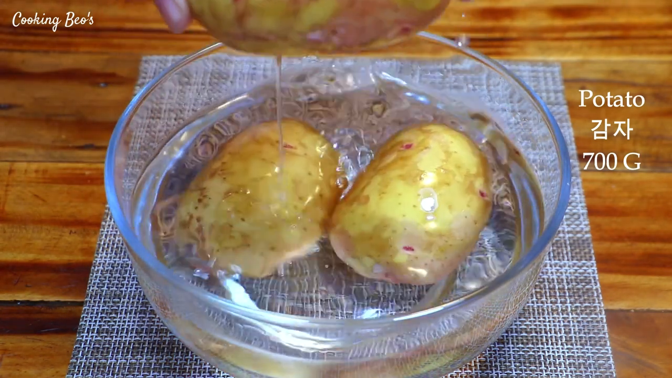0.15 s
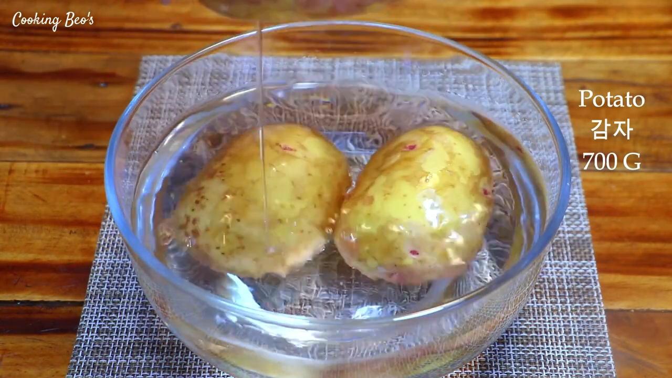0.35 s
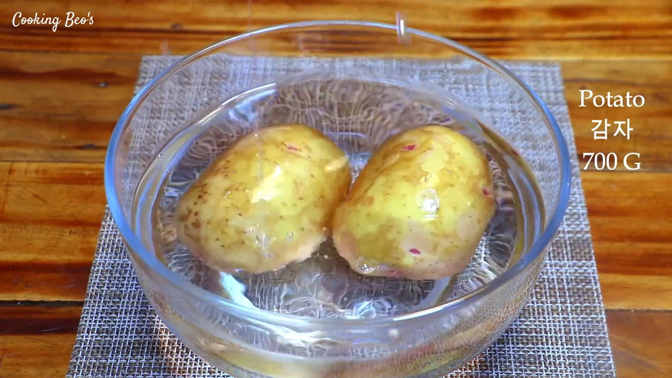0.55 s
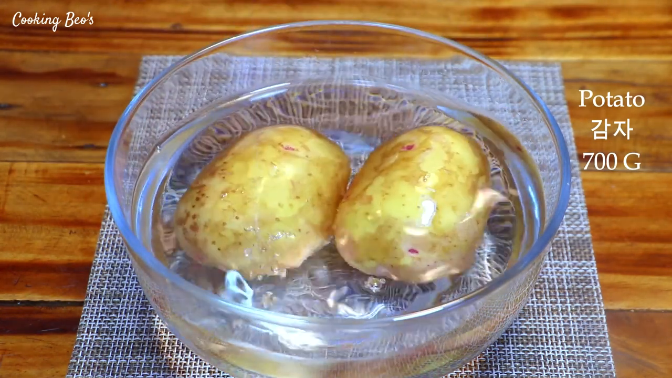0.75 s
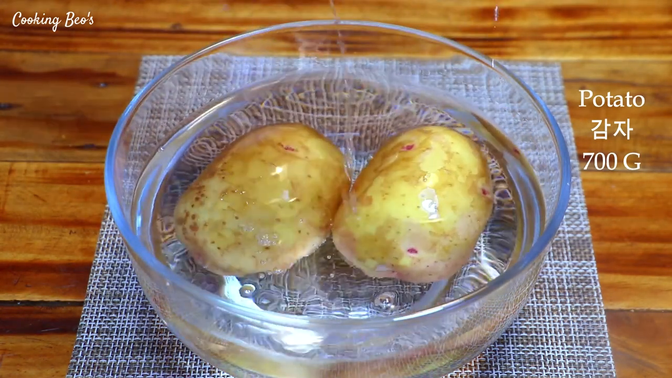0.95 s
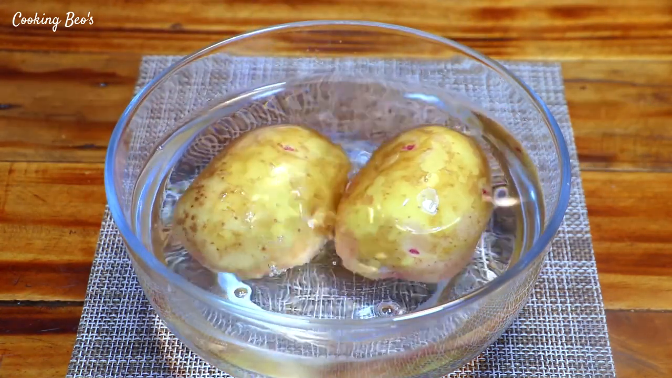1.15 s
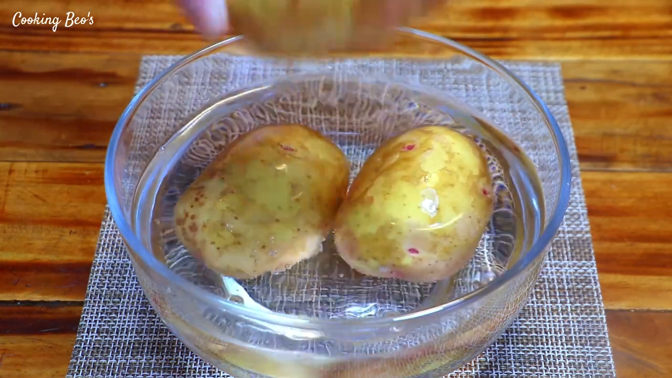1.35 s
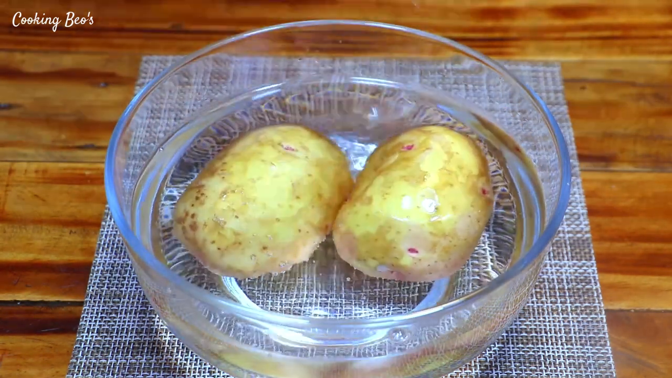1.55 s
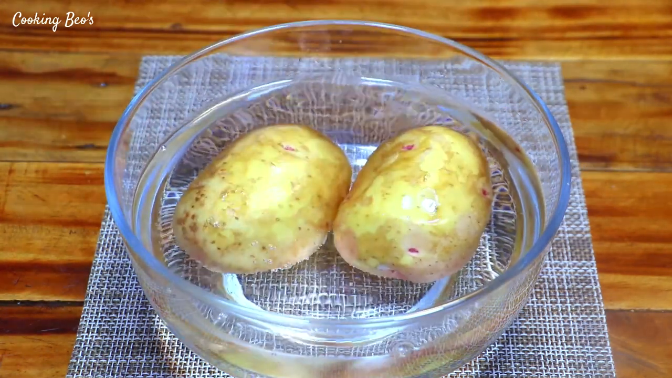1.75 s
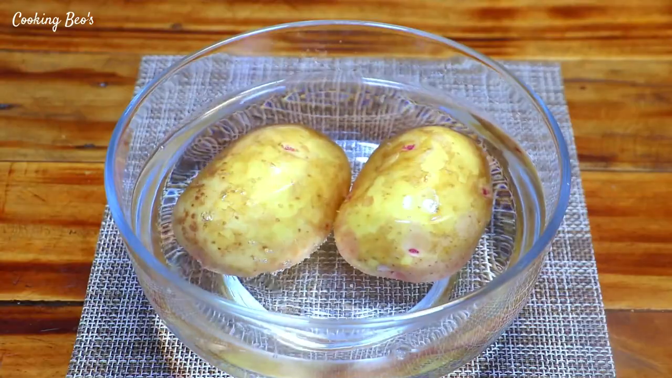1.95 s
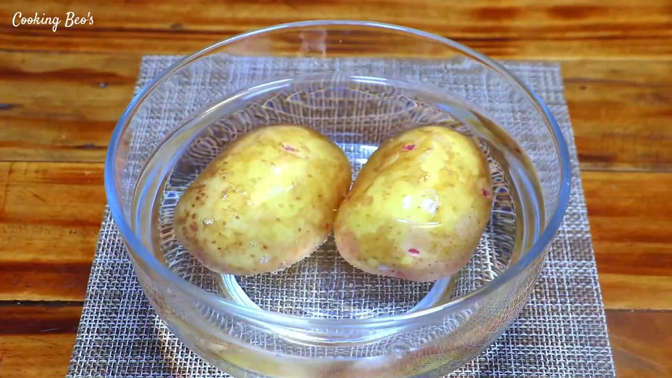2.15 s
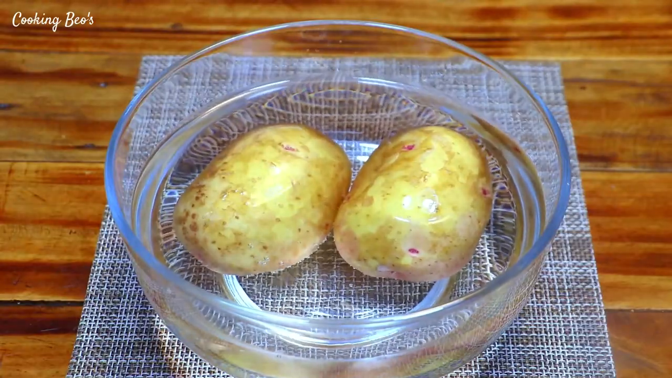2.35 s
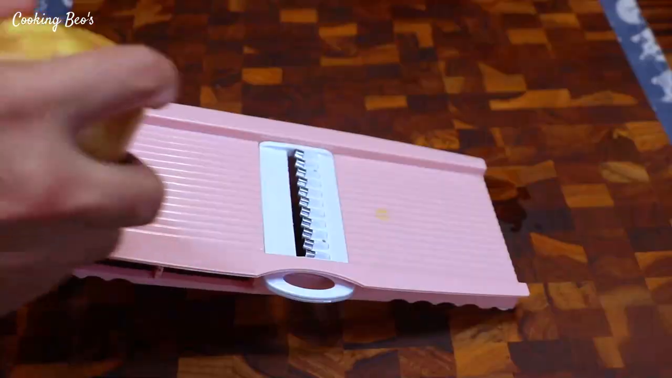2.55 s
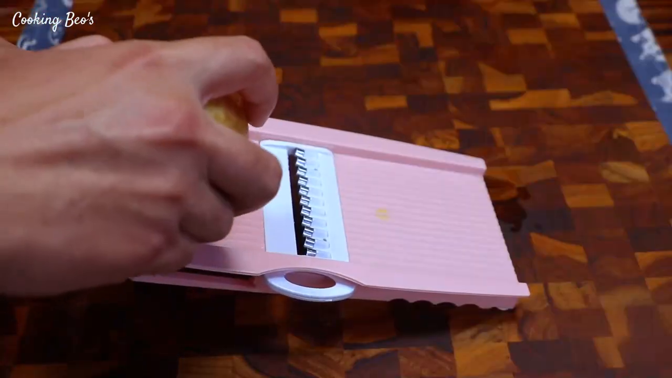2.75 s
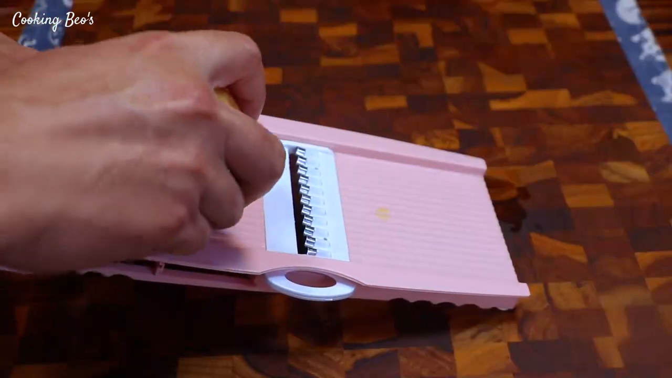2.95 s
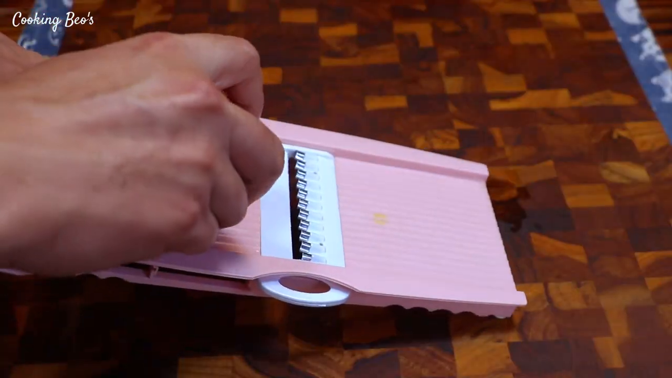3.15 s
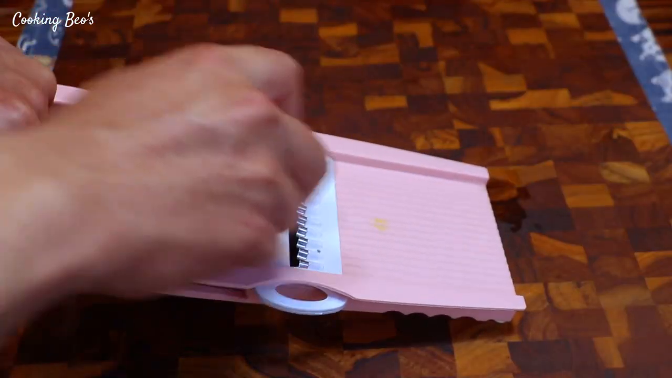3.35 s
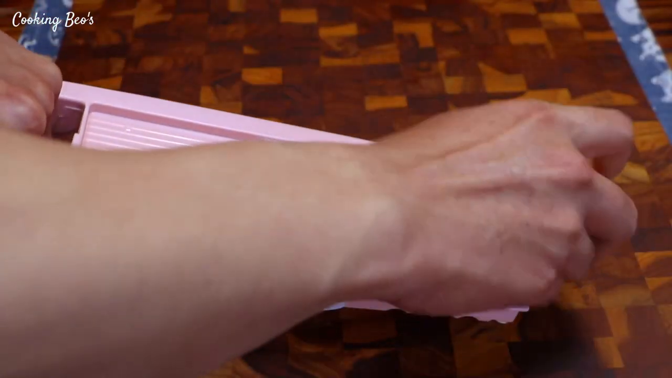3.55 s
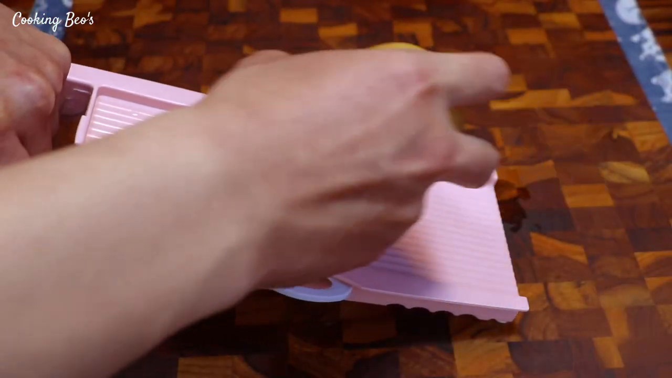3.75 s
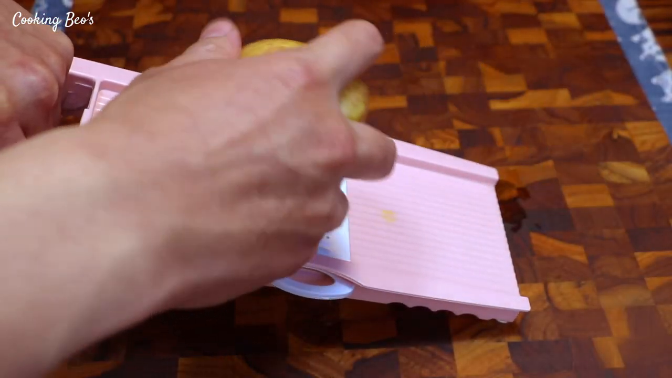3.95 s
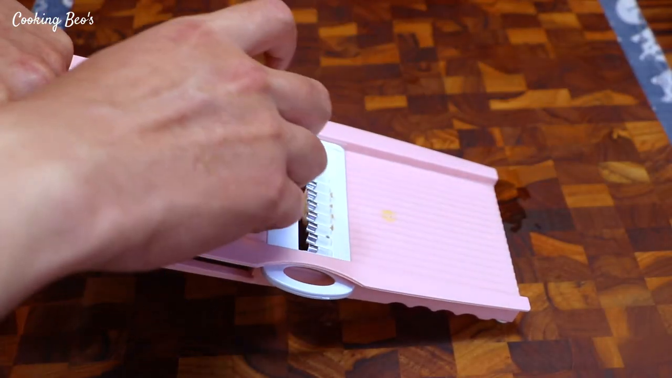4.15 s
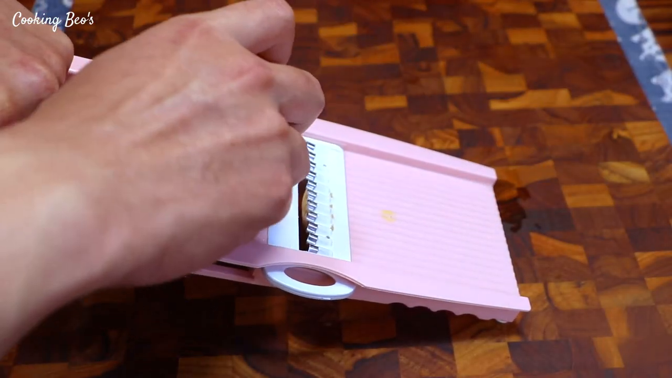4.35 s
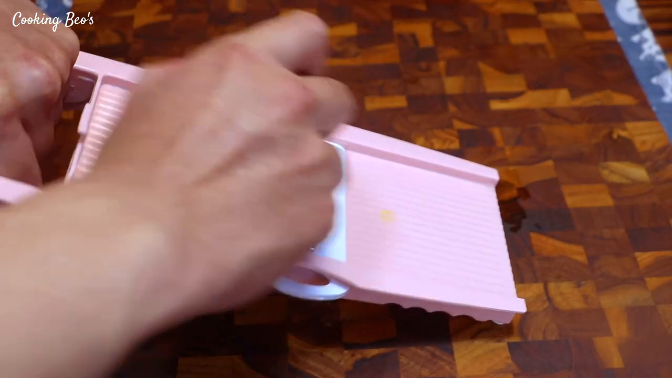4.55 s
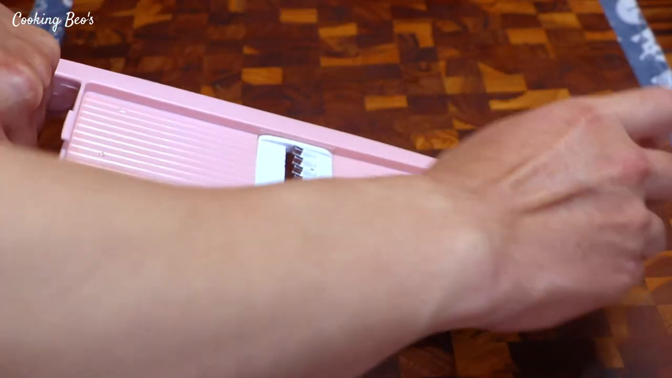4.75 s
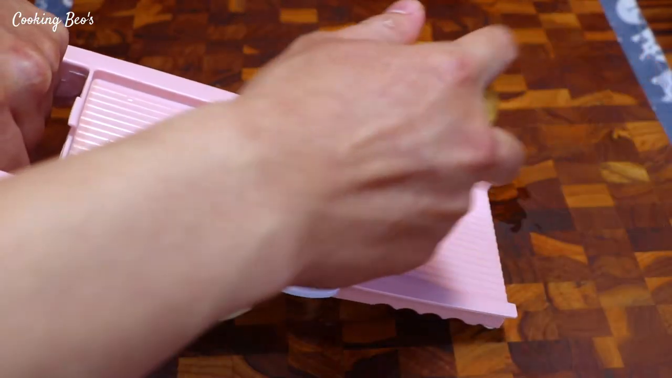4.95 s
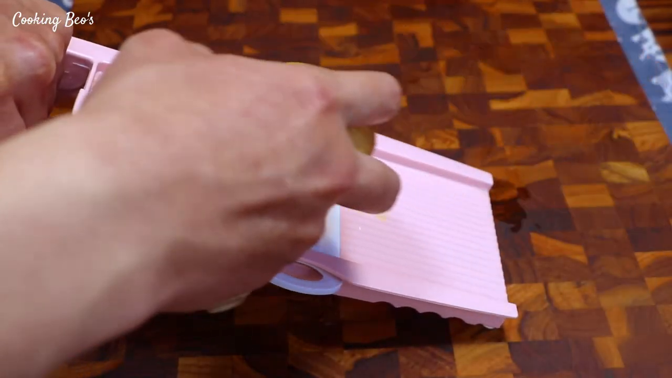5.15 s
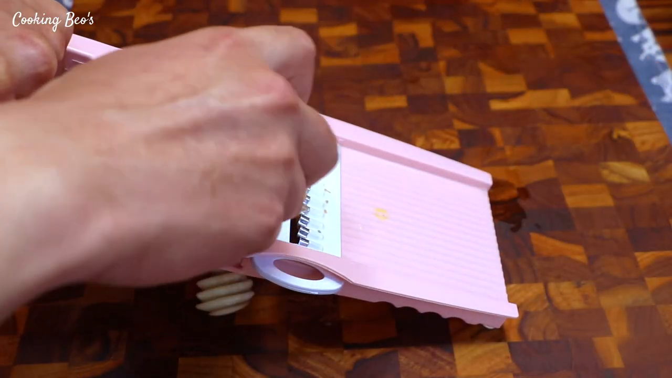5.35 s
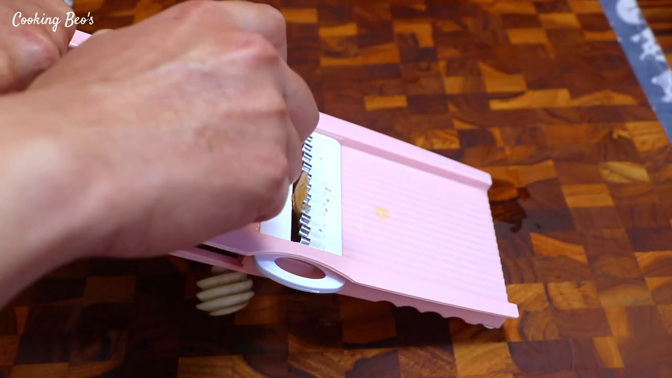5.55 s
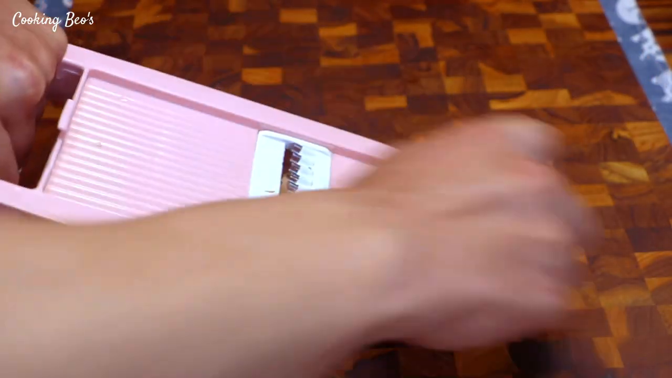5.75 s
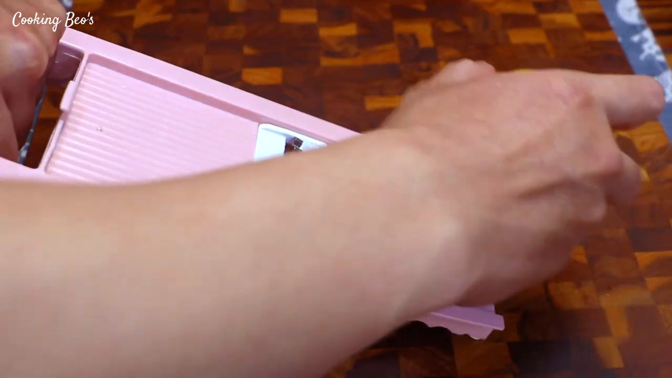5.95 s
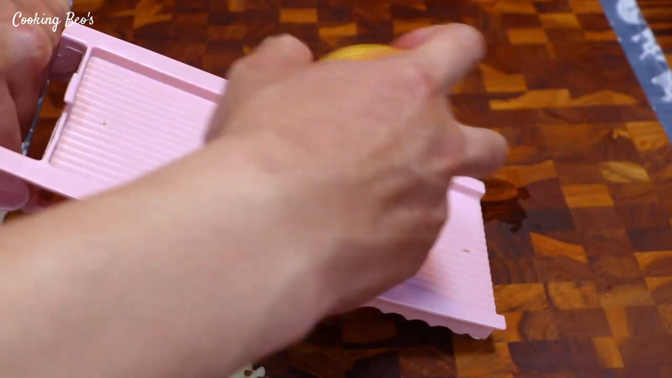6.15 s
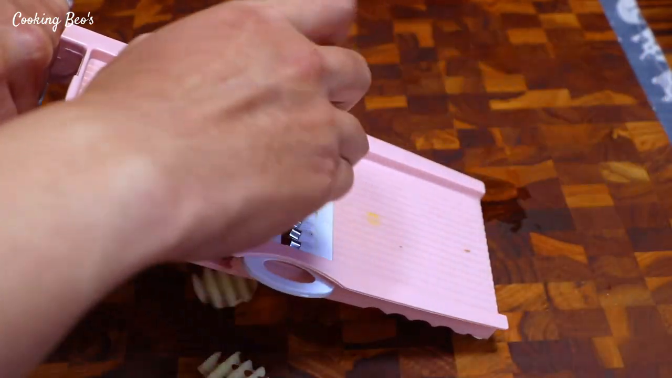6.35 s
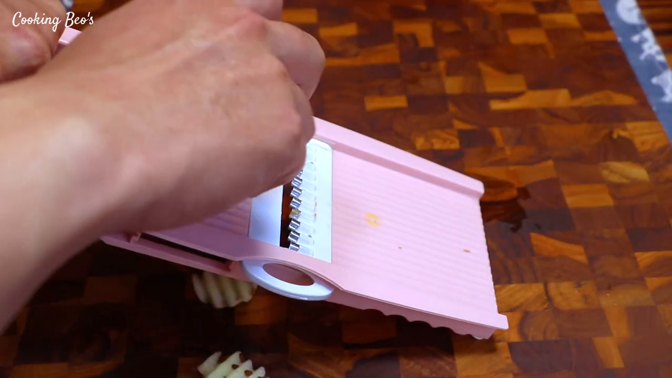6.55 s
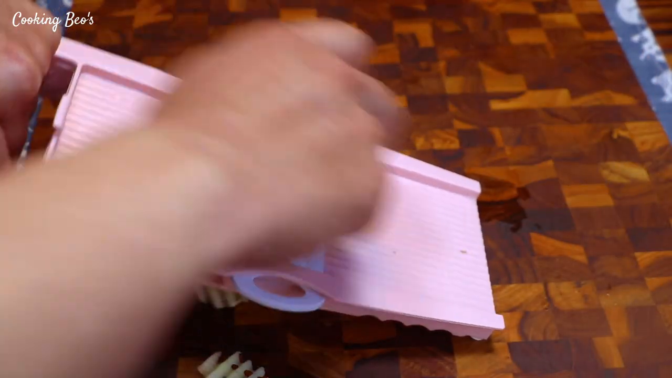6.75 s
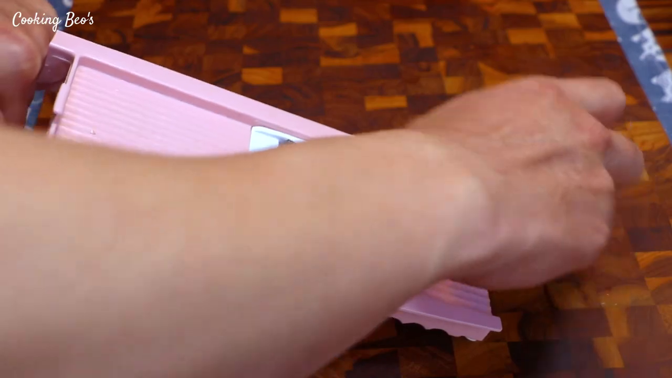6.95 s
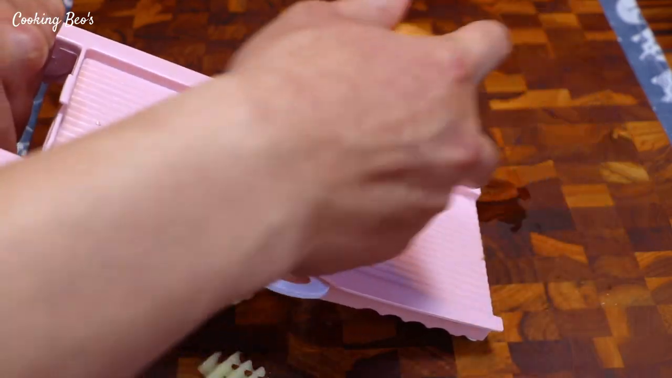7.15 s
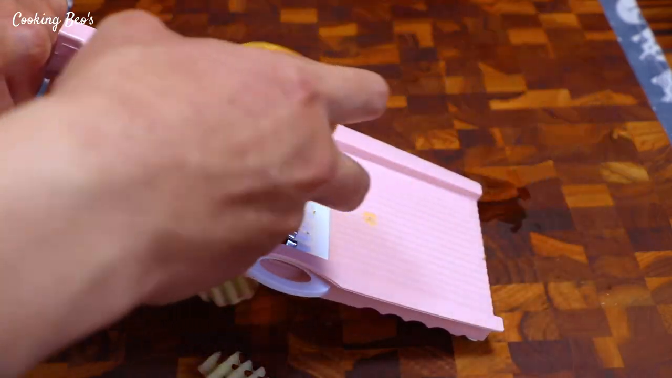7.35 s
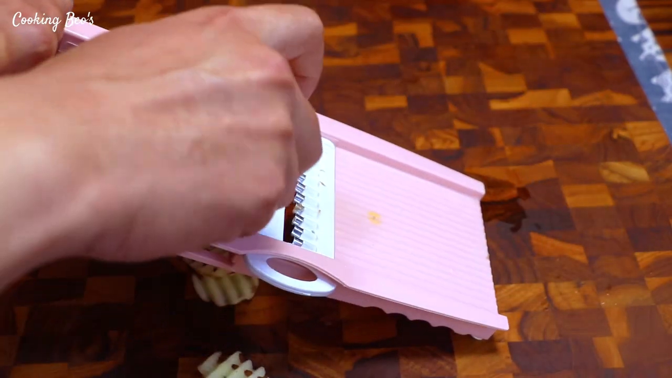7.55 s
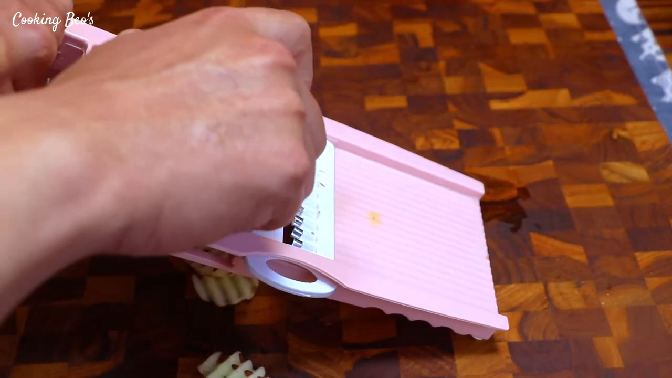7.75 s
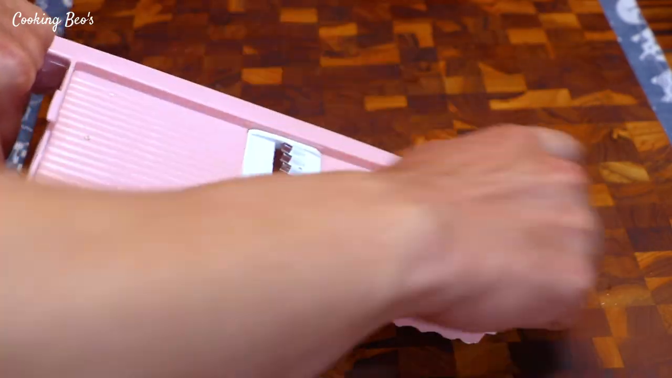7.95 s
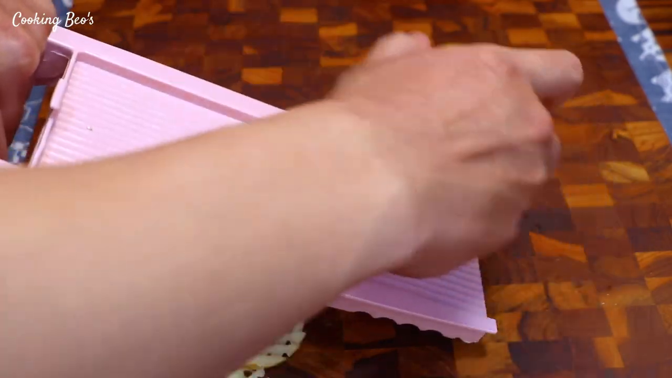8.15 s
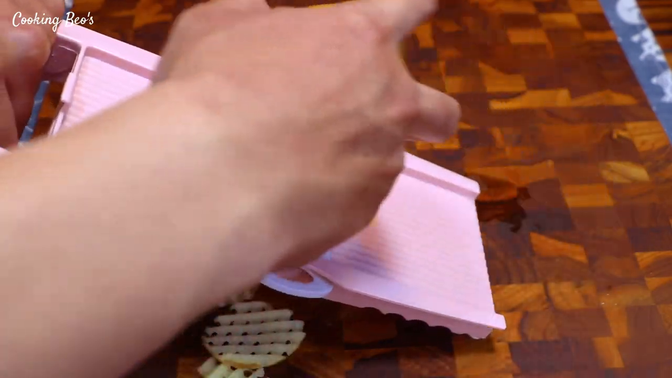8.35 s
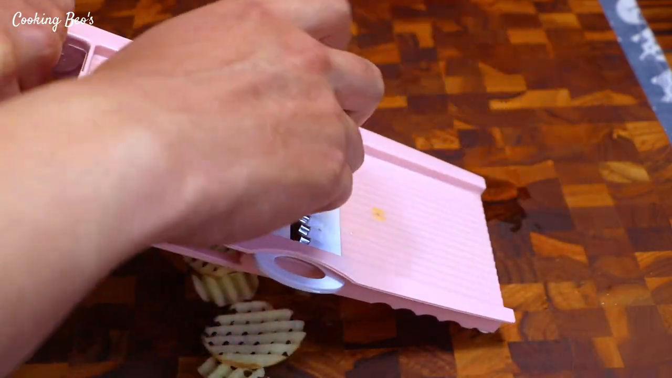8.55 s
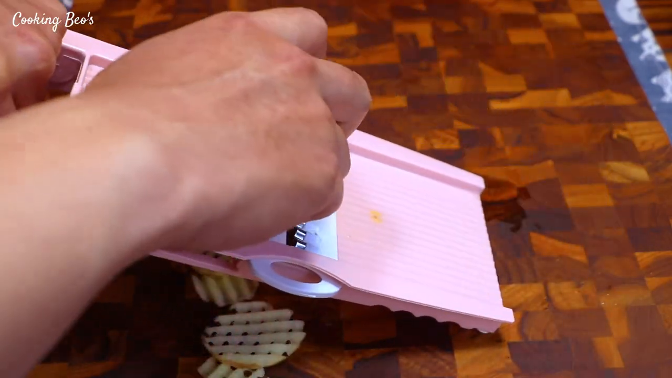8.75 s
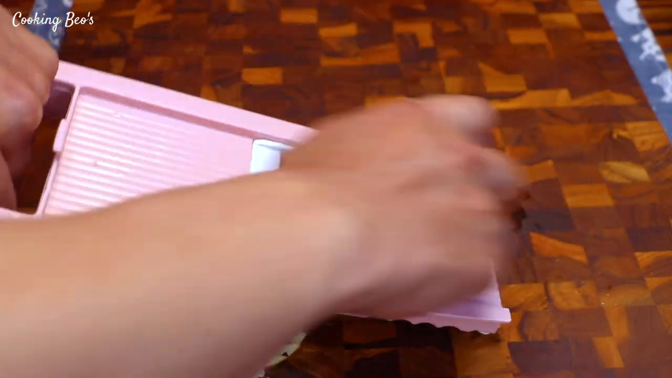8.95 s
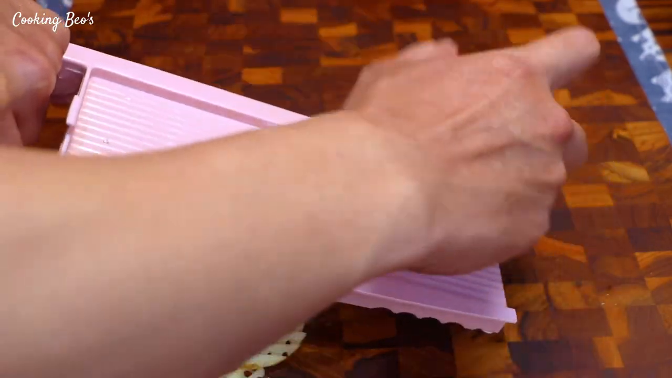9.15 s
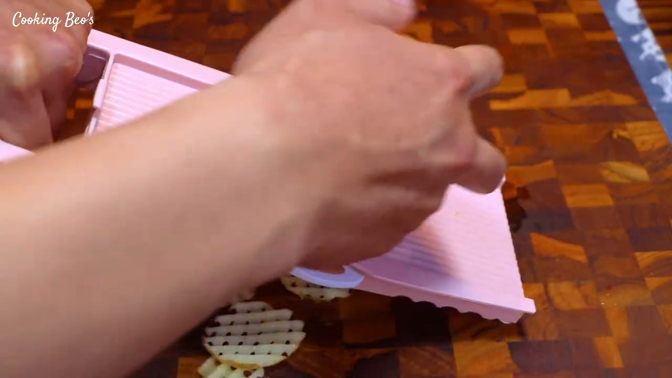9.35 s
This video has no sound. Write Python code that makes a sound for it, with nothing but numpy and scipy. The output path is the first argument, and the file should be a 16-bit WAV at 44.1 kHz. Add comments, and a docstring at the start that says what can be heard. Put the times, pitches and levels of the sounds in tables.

```python
"""A quiet, reverberant kitchen. Water drips from a lifted potato into a glass bowl, each drop an impact
and a ringing bubble; a fizz fades, and a faint tone sinks over room noise and mains hum. The potato is
then pushed six times through a plastic mandoline: each cut is a dense crunch of bursting cells that
excites the resonances of frame and blade, with soft knocks and wet rubs between. An expander turns
quiet passages down, and saturation flattens the loudest peaks."""
import sys
import numpy as np
from scipy import signal
from scipy.fft import rfft, irfft, next_fast_len
from scipy.io import wavfile
from scipy.ndimage import uniform_filter1d

SR = 44100
rng = np.random.default_rng(int(sys.argv[2]) if len(sys.argv) > 2 else 0)


def output_pcm(signal):
    """Save a mono or channel-first signal as 16-bit PCM at the path in sys.argv[1].

    Samples are clipped to [-1, 1] before scaling.
    """
    pcm = np.clip(np.atleast_2d(signal).T, -1, 1) * 32767
    wavfile.write(sys.argv[1], SR, np.round(pcm).astype(np.int16))


N = 414099
AT_BOARD_S = 2.5  # the fizz ends and the background drops

# Loudest drops, listed one by one: start_s, level_db, pitch_hz, t60_cycles, relative_climb_per_s
LOUD_DROPS = [(.0003, -19.5, 3440, 35, 4), (.030, -26, 1545, 73, -0.5), (.059, -21.5, 2950, 75, -3),
              (.231, -28.5, 12500, 48, 5.5), (.2466, -30, 4370, 23, 6), (.3474, -34, 4200, 70, 10),
              (.365, -19.5, 4260, 65, 0.5), (.384, -26.5, 3480, 55, 1.5), (.459, -22.5, 1855, 55, 6.5),
              (.47, -29, 3450, 110, 1), (.532, -28, 6740, 72, -2), (.5498, -14.5, 6586, 55, -0.5),
              (.565, -25, 1275, 50, 3.5), (.6, -24, 1660, 75, 19.5), (.632, -20, 3520, 96, 45.5),
              (.648, -19.5, 2953, 115, 10), (.657, -12.5, 2600, 60, 19), (.69, -23.5, 4150, 100, 1.5),
              (.704, -23, 2140, 58, 1.5), (.750, -31, 2350, 170, 17), (.759, -24.5, 3130, 240, 63),
              (.8168, -35, 1614, 160, 0.5), (.834, -21, 1620, 140, 1.5), (.9039, -21, 4450, 65, 4),
              (1.1147, -38, 9240, 70, 0)]
# Strength of the trickle off the potato: time_s, level_db
TRICKLE_ENVELOPE = [(0.0, -59.5), (0.348, -65), (0.494, -53), (0.608, -50), (0.768, -50.5), (0.914, -59),
                    (1.138, -70), (1.25, -86)]
# Spectra of a drop's tick, the fizz, the reverberation and the room noise: frequency_hz, gain_db
TICK_SPECTRUM = [(300, -25.5), (1200, -13), (4000, 2), (9000, 2.5), (13000, -2), (16000, 1.5)]
FIZZ_SPECTRUM = [(300, -29), (1200, -2.5), (3200, 2), (5500, -3), (9000, -4), (13000, -1.5), (16000, -4)]
REVERB_SPECTRUM = [(100, -1), (270, 2), (600, 0.5), (1500, -0.5), (2600, -1), (3500, -5.5), (5200, 3.5),
                   (8000, -0.5), (14000, -6)]
AIR_SPECTRUM = [(20, -14), (50, -7), (130, -8), (180, -3.5), (400, -6.5), (700, -11), (2000, -18.5),
                (6000, -24.5), (13000, -30), (16000, -31.5)]
# Reverberation time of the kitchen: frequency_hz, t60_s
REVERB_TIMES = [(100, 0.54), (270, 1), (600, 0.56), (1500, 0.63), (4000, .7), (8000, .58), (14000, 0.72)]
# Mains harmonics: pitch_hz, level_db
HUM_PARTIALS = [(50, -72.5), (100, -67.5)]
# Potato and slices striking frame and board: start_s, level_db, pitch_hz, relative_thud_db
KNOCK_EVENTS = [(3.052, -33.5, 1277, -19.5), (4.219, -44, 1230, 3.5), (5.087, -30, 870, -22),
                (5.168, -40.5, 902, -18.5), (5.47, -54, 1185, 0), (6.188, -42.5, 722, -18),
                (6.461, -45.5, 954, -13.5), (8.264, -31, 832, -20), (8.67, -48.5, 985, 11.5),
                (9.311, -30, 1414, -10)]
# Plastic modes excited by a knock: pitch_ratio, gain_db, t60_s
PLASTIC_MODES = [(.66, -6, .022), (1, 3, .017), (1.24, -3.5, .017), (1.6, -9.5, .014)]
# Resonances of the mandoline's blade, ramp and frame: centre_hz, bandwidth_hz, gain_db
BLADE_MODES = [(3355, 530, 8), (4310, 790, -5)]
RAMP_MODES = [(747, 57, -5), (1010, 380, 1.5), (1283, 200, 4), (1412, 150, 11), (2020, 270, -4),
              (2450, 1300, -10.5)]
FRAME_MODES = [(261, 50, -1.5), (314, 240, 4), (446, 110, -8), (718, 180, 2), (960, 74, 2)]
# The potato drawn back up the ramp: centre_s, half_width_s, level_db
RETURN_STROKES = [(3.234, .055, -65), (5.472, 0.043, -61.5), (6.535, 0.1, -62), (7.77, .15, -62)]
# Spectra of wet friction and of bursting cells: frequency_hz, gain_db
RUB_SPECTRUM = [(100, -9), (500, -4.5), (1500, 4.5), (3400, -2.5), (5000, -4.5), (8600, -10), (11000, -14),
                (16000, -17.5)]
CRUNCH_SPECTRUM = [(60, -37), (150, -25), (300, -13.5), (800, 0.5), (2000, 2), (2800, 2), (4000, -1.5),
                   (5000, -5), (7000, -9), (8600, -8), (10200, -13.5), (12500, -10), (16000, -16)]
# Cuts (shove is how hard the hand bears down): start_s, length_s, level_db, shove_db, plate_hz, plate_db
CUT_STROKES = [(3.502, .045, -15.5, -7.5, 1436, -13.5), (4.686, 0.033, -10, 3, 1950, -21),
               (5.802, .034, -10, 5, 985, -8), (6.856, .042, -11.5, 1.5, 1458, -7.5),
               (7.96, 0.048, -12.5, -1, 916, -8.5), (9.004, 0.052, -13, -1.5, 1650, -10.5)]
# Modes of the cutting board under the frame: pitch_hz, gain_db, t60_s
BOARD_MODES = [(173, -17, 1.7), (218, -6, .55), (231, -1, 0.96), (250, -3.5, .77), (278, -4, .7),
               (300, -3, 1.4)]
# Single fibres and skin breaking: start_s, level_db
FIBRE_SNAPS = [(3.5036, 3.5), (3.5748, -20), (4.6922, -6.5), (6.9154, -30.5), (7.9671, -5.5), (7.9793, 3.5),
               (9.0069, 1)]


def amp(db):
    """Amplitude ratio of a level in decibels."""
    return 10 ** (np.asarray(db) / 20)


def unit_rms(x):
    """Normalisation to rms 1."""
    return x / np.sqrt(np.mean(x ** 2) + 1e-20)


def unit_peak(x):
    """Normalisation to peak 1."""
    return x / (np.abs(x).max() + 1e-20)


def along(points, hz):
    """Interpolation of (frequency_hz, value) points on a log frequency axis."""
    frequencies, values = np.transpose(points)
    return np.interp(np.log(hz + 1), np.log(frequencies + 1), values)


def add(track, start_s, sound):
    """Superposition of a sound on the track, in place."""
    part = track[max(0, round(start_s * SR)):][:len(sound)]
    part += sound[:len(part)]


def filtered(x, response):
    """Linear filtering: the spectrum is multiplied by a frequency response."""
    size = 2 * next_fast_len(len(x) // 2 + 4096)
    return irfft(rfft(x, size) * response(np.fft.rfftfreq(size, 1 / SR)), size)[:len(x)]


def coloured(x, spectrum):
    """Minimum-phase filtering: folding the cepstrum makes the given gain curve causal."""
    def response(hz):
        cepstrum = irfft(np.log(amp(along(spectrum, hz))))
        half = len(cepstrum) // 2
        return np.exp(rfft(np.r_[cepstrum[0], 2 * cepstrum[1:half], np.zeros(half)]))
    return filtered(x, response)


def resonate(x, modes):
    """Forced vibration: x drives parallel second-order resonators of alternating sign."""
    def response(hz):
        return sum((-1) ** k * amp(db) * 1j * hz * width / (centre ** 2 - hz ** 2 + 1j * hz * width)
                   for k, (centre, width, db) in enumerate(modes))
    return filtered(x, response)


def burst(t, t60_s):
    """Exponential decay of white noise."""
    return rng.standard_normal(len(t)) * amp(-60 * t / t60_s)


def swell(centre_s, half_width_s):
    """Gaussian envelope: a smooth rise and fall."""
    return np.exp(-((np.arange(N) / SR - centre_s) / half_width_s) ** 2)


def impulses(t, rate_per_s, spread_db):
    """Poisson process: independent impulses, a few far larger than the rest."""
    occurs = rng.random(len(t)) < rate_per_s / SR
    sign = rng.choice([-1, 1], len(t))
    size = np.minimum(rng.exponential(size=len(t)), 3)
    return unit_rms(occurs * sign * amp(spread_db * size))


def drips(bubble_db=-2, impact_db=-5.5, tick_db=-9, tick_db_per_octave=4.5, room_db=-11, lowest_hz=1050):
    """Bubble resonance: each drop ticks on the surface and jolts a bubble, whose pitch climbs if it rises."""
    bubbles, ticks = np.zeros(N), np.zeros(N)
    t = np.arange(SR // 10) / SR
    for start_s, db, hz, cycles, climb in list(LOUD_DROPS) + lesser_drops():
        bubble = np.sin(2 * np.pi * hz * (t + climb * t ** 2 / 2)) * amp(-60 * t * hz / cycles)
        submerged = 1 / (1 + np.abs(climb * t / .4) ** 8)  # a fast climb ends at the surface
        impact = np.sin(2 * np.pi * hz * t) * np.exp(-t * hz / 2) * (1 - np.exp(-2 * t * hz))
        add(bubbles, start_s, amp(db) * (amp(bubble_db) * bubble * submerged + amp(impact_db) * impact))
        tick = unit_peak(coloured(burst(t, t60_s=.0056), TICK_SPECTRUM))
        size_db = tick_db_per_octave * np.log2(hz / 3000)  # smaller drops tick more
        add(ticks, start_s, amp(db + tick_db + size_db) * tick)
    splashes = ticks + spatter() + fizz()
    water = bubbles + splashes
    water = bowl(water) + amp(room_db) * room(water)
    # drops this small radiate no bass
    return signal.sosfilt(signal.butter(8, lowest_hz, "high", fs=SR, output="sos"), water)


def trickle_db(time_s):
    """Envelope of the flow, which sets the level of the lesser drops."""
    return np.interp(time_s, *np.transpose(TRICKLE_ENVELOPE))


def spatter(count=260, middle_hz=4500, log_spread=.42, t60_cycles=18, scatter_db=5, over_trickle_db=11):
    """Damped oscillation: tiny droplets of random size ping, loudest where the trickle is strong."""
    out, t = np.zeros(N), np.arange(SR // 25) / SR
    starts = rng.uniform(0, TRICKLE_ENVELOPE[-1][0], count)
    for start_s, (size, strength) in zip(starts, rng.standard_normal((count, 2))):
        hz = np.clip(middle_hz * np.exp(log_spread * size), 1100, 14000)
        db = trickle_db(start_s) + over_trickle_db + scatter_db * min(strength, 1)
        add(out, start_s, amp(db - 60 * t * hz / t60_cycles) * np.sin(2 * np.pi * hz * t))
    return out


def fizz(level_db=-62, fade_db_per_s=4.5, hiss_swell_db=-64.5):
    """Shot noise: a fine fizz fades as the water settles, with one soft swell of hiss."""
    t = np.arange(N) / SR
    settling = amp(level_db - fade_db_per_s * t)
    hiss_swell = amp(hiss_swell_db) * swell(centre_s=1.77, half_width_s=.15)
    crackle = unit_rms(coloured(impulses(t, rate_per_s=5600, spread_db=5), FIZZ_SPECTRUM))
    return (settling + hiss_swell) * (t < AT_BOARD_S) * crackle


def bowl(x, wall_db=-10, t60_s=.055):
    """Early reflections between the glass wall and the water add to the direct sound."""
    echoes = burst(np.arange(SR // 15) / SR, t60_s)
    return x + amp(wall_db) * signal.fftconvolve(x, echoes / np.linalg.norm(echoes))[:N]


def room(x, onset_s=.0015, late_s=.42):
    """Diffuse reverberation: each frequency decays at its own rate, and the late tail falls faster."""
    hz, t, noise = signal.stft(rng.standard_normal(SR), SR, nperseg=256)
    decay_db = -60 * t / along(REVERB_TIMES, hz)[:, None] - 10 * (t / late_s) ** 4
    tail = signal.istft(noise * amp(decay_db), SR, nperseg=256)[1]
    tail *= 1 - np.exp(-np.arange(len(tail)) / SR / onset_s)
    return signal.fftconvolve(x, coloured(tail / np.linalg.norm(tail), REVERB_SPECTRUM))[:len(x)]


def ambience(air_db=-63, air_drop_db=-1, hum_drop_db=-3):
    """Noise floor: broadband room noise and mains harmonics, both weaker at the cutting board."""
    t = np.arange(N) / SR
    at_board = t > AT_BOARD_S
    air = unit_rms(coloured(rng.standard_normal(N), AIR_SPECTRUM))
    hum = sum(amp(db) * np.sqrt(2) * np.sin(2 * np.pi * hz * t) for hz, db in HUM_PARTIALS)
    return amp(air_db + air_drop_db * at_board) * air + amp(hum_drop_db * at_board) * hum


def lesser_drops(count=16, span_s=(.43, .71), middle_hz=2388, log_spread=.4, over_trickle_db=17.5,
                t60_cycles=60, climb_per_s=18):
    """Stream break-up: rows of lesser drops, laid out as LOUD_DROPS, louder when more water runs."""
    jitter, size = rng.random((count, 2)).T
    starts = np.interp((np.arange(count) + jitter) / count, [0, 1], span_s)
    pitches = middle_hz * np.exp(log_spread * np.sqrt(3) * (2 * size - 1))
    return [(s, trickle_db(s) + over_trickle_db, hz, t60_cycles, climb_per_s)
            for s, hz in zip(starts, pitches)]


def moan(centre_s=2.3, half_width_s=.17, pitch_hz=436, sag_hz_per_s=320, fuzz_hz=55, level_db=-58):
    """Amplitude modulation by slow noise blurs a faint background tone that swells and sinks."""
    t = np.arange(N) / SR - centre_s
    fuzz = unit_rms(filtered(rng.standard_normal(N), lambda hz: np.exp(-(hz / fuzz_hz) ** 2)))
    tone = np.sin(2 * np.pi * (pitch_hz * t - sag_hz_per_s * t ** 2 / 2))
    return amp(level_db) * swell(centre_s, half_width_s) * fuzz * tone


def knocks(room_db=-15, thud_hz=140, thud_width_hz=110, tick_db=-13, tick_per_thud=.77, attack_s=.0006):
    """Impact excitation: damped plastic modes, a low thud and a blade tick that grows with the thud."""
    out, t = np.zeros(N), np.arange(SR // 10) / SR
    for start_s, db, hz, thud_db in KNOCK_EVENTS:
        ring = sum(amp(mode_db - 60 * t / t60_s) * np.sin(2 * np.pi * (hz * ratio * t + rng.random()))
                   for ratio, mode_db, t60_s in PLASTIC_MODES)
        knock = unit_peak(ring * (1 - np.exp(-t / attack_s)) ** 2)
        thud = amp(thud_db) * unit_peak(resonate(burst(t, t60_s=.02), [(thud_hz, thud_width_hz, 0)]))
        tick = unit_peak(resonate(burst(t, t60_s=.017), BLADE_MODES))
        add(out, start_s, amp(db) * (knock + thud + amp(tick_db + tick_per_thud * thud_db) * tick))
    return out + amp(room_db) * room(out)


def doubled(x, lead_db, lead_s=.0178, cutoff_hz=5000):
    """Pre-echo: a fainter, duller copy arrives just ahead of the full sound."""
    lead = round(lead_s * SR)
    early = filtered(np.pad(x[lead:], (0, lead)), lambda hz: 1 / (1 + 1j * hz / cutoff_hz))
    return x + amp(lead_db) * early


def rubbing(run_up_db=-49, run_up_lead_s=.018, blade_db=-9):
    """Wet friction: sparse slips as the potato is drawn back and run up to the blade."""
    t = np.arange(N) / SR
    run_ups = sum(swell(start_s - run_up_lead_s, half_width_s=.046) for start_s, *_ in CUT_STROKES)
    returns = sum(amp(db) * swell(centre_s, half_s) for centre_s, half_s, db in RETURN_STROKES)
    pressure = amp(run_up_db) * run_ups + returns
    slips = impulses(t, rate_per_s=300, spread_db=3.5) + .5 * rng.standard_normal(N)
    blade = amp(blade_db) * unit_rms(resonate(slips, BLADE_MODES))
    return pressure * (unit_rms(coloured(slips, RUB_SPECTRUM)) + blade)


def cut(length_s, level_db, shove_db, plate_hz, plate_db, crunch_db=-2, ramp_db=-7,
        bite_db=3, bite_s=.005, attack_s=.001, release_t60_s=.024, lowest_hz=135):
    """Fracture: cells burst as the blade bites and tears through, driving the mandoline's resonances."""
    t = np.arange(SR // 7) / SR
    depth = np.minimum(t / length_s, 1)
    # a heavy shove thumps the frame; a light one builds up and lets the blade ring
    frame_db = -13.5 + 1.05 * shove_db
    build_db = (2 - .63 * shove_db) * (depth - .5)
    blade_db = -5 - .7 * shove_db
    release_db = -60 * np.maximum(t - length_s, 0) / release_t60_s
    force_db = level_db + bite_db * np.exp(-t / bite_s) + build_db + release_db
    force = amp(force_db) * (1 - np.exp(-t / attack_s))
    cells = impulses(t, rate_per_s=5000, spread_db=3) * force
    crunch = amp(crunch_db) * unit_rms(coloured(cells, CRUNCH_SPECTRUM))
    ramp = amp(ramp_db) * unit_rms(resonate(cells * amp(-3 * depth), RAMP_MODES))
    # where the potato presses sets the pitch of the plate
    plate = amp(plate_db) * unit_rms(resonate(cells, [(plate_hz, plate_hz / 4, 0)]))
    blade = amp(blade_db) * unit_rms(resonate(cells * amp(3 * depth), BLADE_MODES))
    frame = amp(frame_db) * unit_rms(resonate(cells * amp(-6 * depth), FRAME_MODES))
    sound = np.sqrt(np.mean(force ** 2)) * (crunch + ramp + plate + blade + frame)
    # a low cut thins the bass of each crunch
    return signal.sosfilt(signal.butter(2, lowest_hz, "high", fs=SR, output="sos"), np.pad(sound, (0, SR)))


def board(samples, shove_db, level_db=-46.5, level_per_shove=2.2, scatter_db=1.2, attack_s=.0033):
    """Free vibration: the wooden board's modes hum on, louder after a heavier shove."""
    t = np.arange(samples) / SR
    ring = np.zeros(samples)
    for hz, db, t60_s in BOARD_MODES:
        envelope = amp(db + rng.normal(0, scatter_db) - 60 * t / t60_s)
        ring += envelope * np.sin(2 * np.pi * (hz * t + rng.random()))
    return amp(level_db + level_per_shove * shove_db) * ring * (1 - np.exp(-t / attack_s))


def slicing(room_db=-14):
    """Structural coupling: each cut sets the board ringing, while its crunch reverberates in the room."""
    out = np.zeros(N)
    for start_s, length_s, level_db, shove_db, plate_hz, plate_db in CUT_STROKES:
        sound = cut(length_s, level_db, shove_db, plate_hz, plate_db)
        add(out, start_s, sound + board(len(sound), shove_db) + amp(room_db) * room(sound))
    return out


def snaps(blade_gain=.55):
    """Sudden fracture: a fibre or the skin breaks with a sharp crack that rings the blade."""
    out, t = np.zeros(N), np.arange(SR // 30) / SR
    for start_s, db in FIBRE_SNAPS:
        crack = burst(t, t60_s=.0069)
        snap = coloured(crack, CRUNCH_SPECTRUM) + blade_gain * resonate(crack, BLADE_MODES)
        add(out, start_s, amp(db) * unit_peak(snap))
    return out


def scene():
    """Superposition of the drips, then the mandoline, on the quiet kitchen."""
    mandoline = doubled(slicing() + snaps(), lead_db=-12.5) + doubled(knocks(), lead_db=-5.5) + rubbing()
    return (drips() + mandoline + ambience() + moan())[None]


def record(dry, open_db=-43, shut_db=-54, depth_db=7, ceiling=1.1, top_hz=15900):
    """Downward expansion lowers quiet passages, saturation flattens peaks, and the band ends steeply."""
    x = dry[0]
    level_db = 10 * np.log10(np.abs(uniform_filter1d(x ** 2, size=1500)) + 1e-12)
    closure = np.clip((open_db - level_db) / (open_db - shut_db), 0, 1)
    x = x * amp(-depth_db * closure)
    x = x / (1 + np.abs(x / ceiling) ** 8) ** (1 / 8)
    return filtered(x, lambda hz: 1 / (1 + (hz / top_hz) ** 200))[None]


dry = scene()
out = record(dry)
output_pcm(out)
```